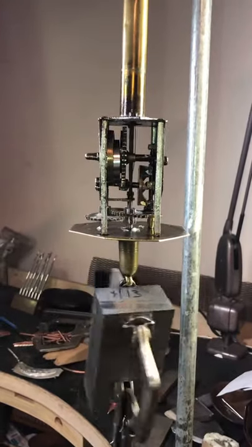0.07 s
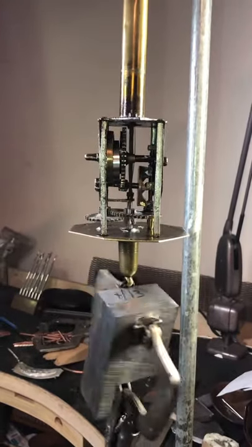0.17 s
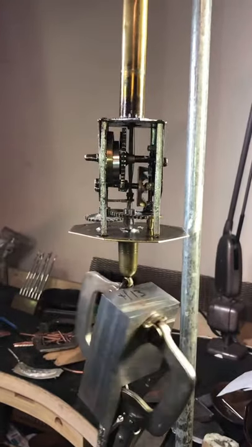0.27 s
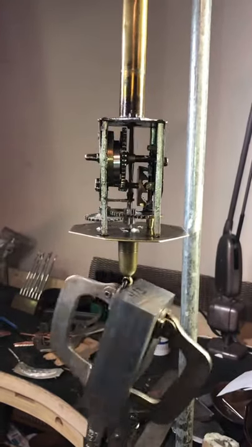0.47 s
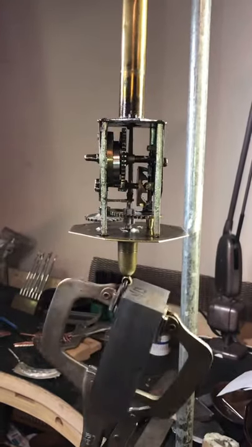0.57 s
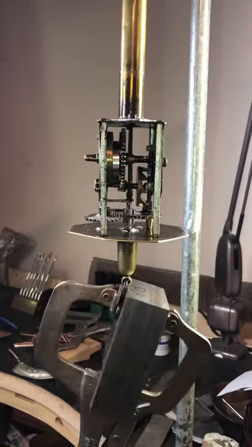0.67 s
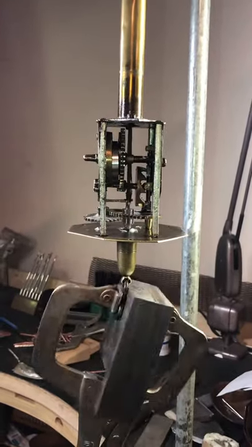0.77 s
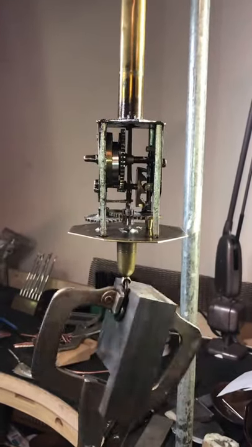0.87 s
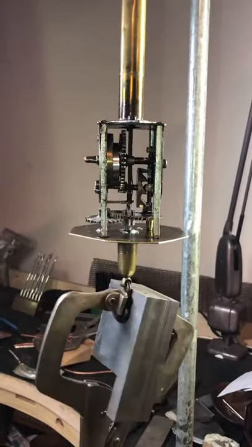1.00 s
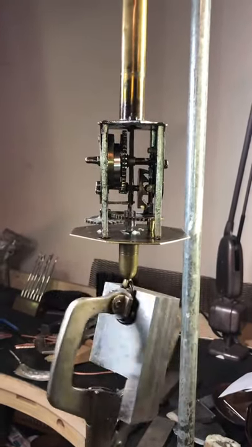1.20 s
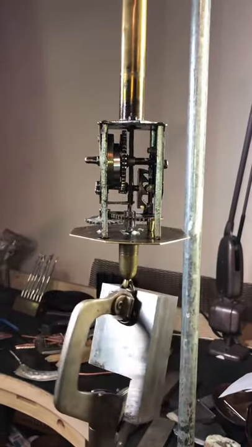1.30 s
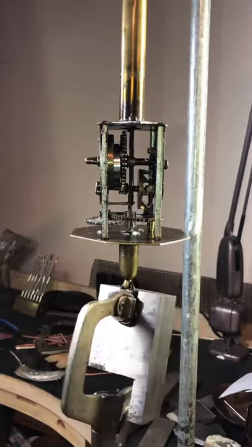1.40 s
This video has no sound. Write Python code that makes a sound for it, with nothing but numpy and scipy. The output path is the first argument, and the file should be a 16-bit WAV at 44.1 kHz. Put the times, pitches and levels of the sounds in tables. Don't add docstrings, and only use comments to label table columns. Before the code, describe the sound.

A clockwork escapement snaps once, close, in a quiet workshop. Low steady room noise runs throughout, with a very faint dull tick at 0.03 s. Tiny slip ticks at 0.19 s lead to a loud, bright steel crack at 0.21 s, bouncing within milliseconds. Metal ring, low frame hum and room answer fade by about 0.5 s; blurred, barely audible bird whistles follow until 1.4 s.

```python
import sys
import numpy as np
from scipy import signal
from scipy.fft import rfft, irfft
from scipy.io import wavfile
from scipy.ndimage import uniform_filter1d

SR = 44100
rng = np.random.default_rng(int(sys.argv[2]) if len(sys.argv) > 2 else 0)


def master_out(mix):
    frames = np.transpose(np.atleast_2d(mix))
    ceiling = np.clip(frames, -1, 1)
    pcm = np.round(ceiling * 32767).astype(np.int16)
    wavfile.write(sys.argv[1], SR, pcm)


def elevation(decibels):
    levels = np.asarray(decibels, float)
    return 10 ** (levels / 20)


N = 63945

# start_s, level_db
CONTACTS = [
    (.1889, -50),
    (.1918, -56),
    (.2004, -56),
    (.2120, 1),
    (.2126, -7),
    (.2134, -1),
    (.2140, -10),
    (.2152, -13),
    (.2178, -14),
    (.2273, -27),
]
BLOW_S = CONTACTS[3][0]


def evened(x):
    return x / np.sqrt(np.mean(x ** 2) + 1e-20)


def read(points, hz):
    f, value = np.transpose(points)
    return np.interp(np.log(hz + 1), np.log(f + 1), value)


def coloured(points, size):
    gain = elevation(read(points, np.fft.rfftfreq(size, 1 / SR)))
    return evened(irfft(rfft(rng.standard_normal(size)) * gain, size))


def resonate(x, hz, width_hz):
    turn = np.exp(2j * np.pi * np.cumsum(hz * np.ones(len(x))) / SR)
    r = np.exp(-np.pi * width_hz / SR)
    return 2 * (turn * signal.lfilter([1 - r], [1, -r], x / turn)).real


def fuzzy(size, hz, width_hz):
    noise = rng.standard_normal(8000 + size)[:size]
    return evened(resonate(resonate(noise, hz, width_hz), hz, width_hz))


def rise(t, rise_s):
    return 1 - np.exp(-(t / rise_s) ** 2)


def placed(start_s, sound):
    return np.concatenate([np.zeros(round(start_s * SR)), sound, np.zeros(N)])[:N]


def hush():
    # freq_hz, level_db_per_hz
    hush_colour = [(21, -39), (35, -8.5), (101, -1), (297, -8), (595, -10.5), (1760, -20), (2580, -21.5),
                   (15300, -38.5), (16500, -47.5)]
    # freq_hz, width_hz, level_db
    hums = [(108, 8.3, -75), (338, 40, -79), (2600, 300, -96), (3902, 900, -87), (8800, 300, -91.5)]
    level_db, patch_db = -65, 1.1
    _, _, z = signal.stft(coloured(hush_colour, N), SR, nperseg=512)
    patches = uniform_filter1d(rng.standard_normal(z.shape), size=8, axis=0)
    patches = evened(uniform_filter1d(patches, size=12, axis=1))
    wash = signal.istft(z * elevation(patch_db * patches), SR, nperseg=512)[1][:N]
    hum = sum(elevation(db) * fuzzy(N, hz, width_hz) for hz, width_hz, db in hums)
    return elevation(level_db) * evened(wash) + hum


def far_tick():
    # start_s, level_db, t60_s
    start_s, level_db, t60_s = (.0297, -66.5, 0.032)
    # freq_hz, width_hz, level_db
    tick_colour = [(2780, 1700, 5.5), (5700, 1000, 2), (8400, 2300, -6)]
    attack_s = 0.00041
    t = np.arange(3000) / SR
    tick = sum(elevation(db) * fuzzy(len(t), hz, width_hz) for hz, width_hz, db in tick_colour)
    envelope = elevation(level_db - 60 * t / t60_s) * np.minimum(t / attack_s, 1)
    return placed(start_s, envelope * tick)


def steel():
    # freq_hz, snap_db, ring_db, ring_t60_s
    steel_modes = [(3125, -22, -31, 0.03), (3680, -21.5, -29, .04), (4620, -25, -29, .035),
                   (5676, -17.5, -35, .03), (6500, -25, -38, .03), (7010, -14, -29.5, .035),
                   (7386, -12.5, -28, 0.07), (7670, -15.5, -27, 0.02), (8067, -13, -33, .035),
                   (9020, -19, -29, .04), (15300, -25.5, -36, .03), (12460, -20, -19.5, 0.053),
                   (13550, -22.5, -34, .035), (14700, -18, -28, 0.029)]
    # freq_hz, level_db
    crack_colour = [(410, -57), (700, -18.5), (3610, -5.5), (5020, -8), (7870, -3), (9720, -18),
                    (12200, -4.5), (13900, -10.5), (16500, -24)]
    snap_t60_s, contact_s = .013, .00015
    crack_db, crack_t60_s = -19, 0.024
    low_cut_hz = 2200
    t, out = np.arange(6000) / SR, np.zeros(N)
    hz, snap_db, ring_db, ring_t60_s = np.transpose(steel_modes)[:, :, None]
    decay = elevation(snap_db - 60 * t / snap_t60_s) + elevation(ring_db - 60 * t / ring_t60_s)
    modes = decay * np.sin(2 * np.pi * hz * t) * rise(t, contact_s)
    shares = rng.uniform(0.19, 1, (len(CONTACTS), len(steel_modes)))
    for (start_s, level_db), share in zip(CONTACTS, shares):
        crack = elevation(crack_db - 60 * t / crack_t60_s) * coloured(crack_colour, len(t))
        out += placed(start_s, elevation(level_db) * (share @ modes + crack))
    return signal.sosfilt(signal.butter(3, low_cut_hz, "high", fs=SR, output="sos"), out)


def room():
    # freq_hz, level_db
    answer_colour = [(120, -33.5), (200, -9.5), (419, -13), (676, -10), (1070, -1), (1470, 0), (7740, -6.5),
                     (15000, -16.5), (16500, -26.5)]
    # freq_hz, t60_s
    room_decay = [(300, 0.51), (1000, 0.14), (3000, 0.32), (8000, 0.38), (12000, .28), (16000, .2)]
    # freq_hz, level_db, t60_s
    lingering = [(1438, -36.5, 0.081), (3070, -55, .3), (3500, -53.5, .3), (4580, -55, .3),
                 (7430, -49.5, .3), (7600, -47, 0.36), (9170, -51.5, .3), (12400, -46.5, .28),
                 (13500, -55, .25), (14220, -54, 0.28), (15300, -56, .22)]
    level_db, rise_s = -36, 0.0054
    relative_width = .05
    hz, t, z = signal.stft(coloured(answer_colour, SR // 2), SR, nperseg=128)
    decay = elevation(-60 * t / read(room_decay, hz)[:, None])
    tail = elevation(level_db) * signal.istft(z * decay, SR, nperseg=128)[1]
    t = np.arange(len(tail)) / SR
    for f, db, t60_s in lingering:
        tail = tail + elevation(db - 60 * t / t60_s) * fuzzy(len(t), f, relative_width * f)
    return placed(BLOW_S, tail * rise(t, rise_s))


def frame():
    # freq_hz, level_db, t60_s, rise_s
    frame_modes = [(156, -53, .5, .035), (355, -47, .14, .02), (680, -44, .21, .028), (850, -45, .07, .006),
                   (1030, -38, .08, .01), (1210, -33, .08, .013), (1420, -39, .07, .005),
                   (1570, -38, .07, .008), (2220, -38, .05, .004)]
    t = np.arange(SR // 2) / SR
    hum = np.zeros(len(t))
    for hz, db, t60_s, rise_s in frame_modes:
        tone = np.sin(2 * np.pi * (hz * t + rng.random()))
        hum += elevation(db - 60 * t / t60_s) * rise(t, rise_s) * tone
    return placed(BLOW_S, hum)


def bird():
    # start_s, length_s, start_hz, middle_hz, end_hz
    bird_notes = [
        (.455, .03, 2950, 3000, 2900),
        (.49, .09, 2850, 3500, 3700),
        (.58, .05, 3550, 3350, 2900),
        (.635, .04, 3400, 3600, 3700),
        (.69, .055, 3600, 3300, 2950),
        (.79, .1, 3000, 3300, 3650),
        (.9, .04, 2350, 2380, 2350),
        (.94, .13, 2430, 2520, 2530),
        (1.08, .03, 2550, 2500, 2450),
        (1.32, .06, 2700, 2700, 2600),
    ]
    note_levels = [-81, -74, -75, -80, -81, -80, -81, -73, -79, -82]
    clear_gain, blur_hz = .6, 350
    echo_db, echo_t60_s = -1, .35
    out = np.zeros(N)
    for (start_s, length_s, start_hz, middle_hz, end_hz), db in zip(bird_notes, note_levels):
        u = np.linspace(0, 1, round(length_s * SR))
        bend_hz = middle_hz - (start_hz + end_hz) / 2
        hz = start_hz + (end_hz - start_hz) * u + 4 * u * (1 - u) * bend_hz
        clear = clear_gain * np.sin(2 * np.pi * np.cumsum(hz) / SR)
        swell = np.sqrt(np.sin(np.pi * u).clip(0))
        out += placed(start_s, elevation(db) * swell * (clear + fuzzy(len(u), hz, blur_hz)))
    t = np.arange(SR // 3) / SR
    echo = rng.standard_normal(len(t)) * elevation(-60 * t / echo_t60_s)
    return out + elevation(echo_db) * signal.fftconvolve(out, echo / np.linalg.norm(echo))[:N]


def scene():
    return (steel() + frame() + room() + far_tick() + hush() + bird())[None]


def top_cut(x):
    return signal.sosfilt(signal.butter(12, 16780, fs=SR, output="sos"), x)


def record(dry):
    edge_hz = 16450
    low_pass = signal.firwin(255, edge_hz, window=("kaiser", 9), fs=SR)
    limited = signal.oaconvolve(dry, low_pass[None], "same")
    return top_cut(limited)


dry = scene()
out = record(dry)
master_out(out)
```